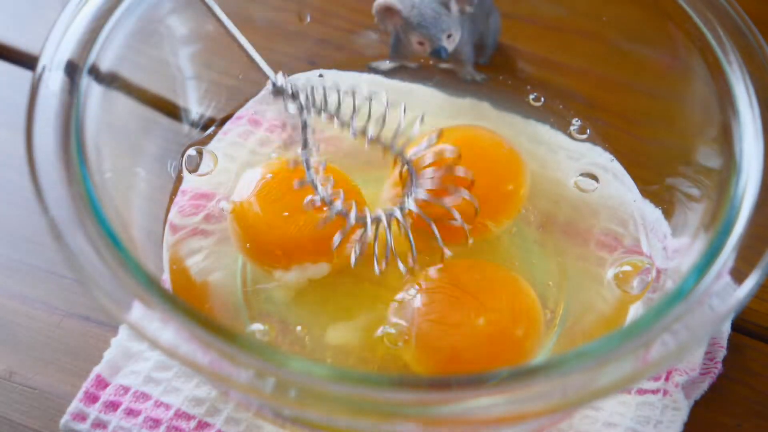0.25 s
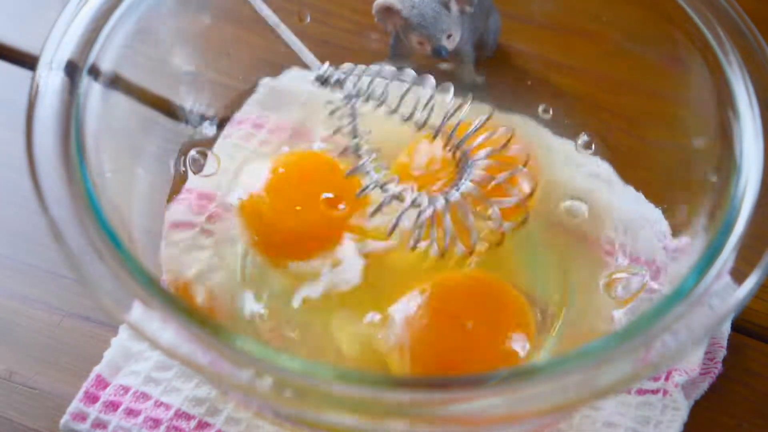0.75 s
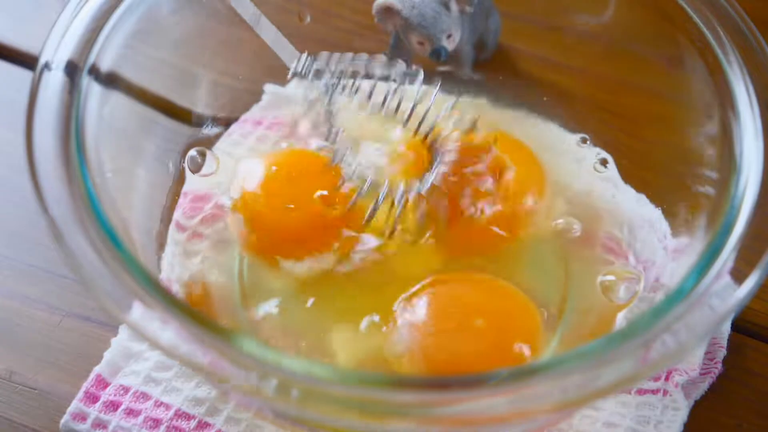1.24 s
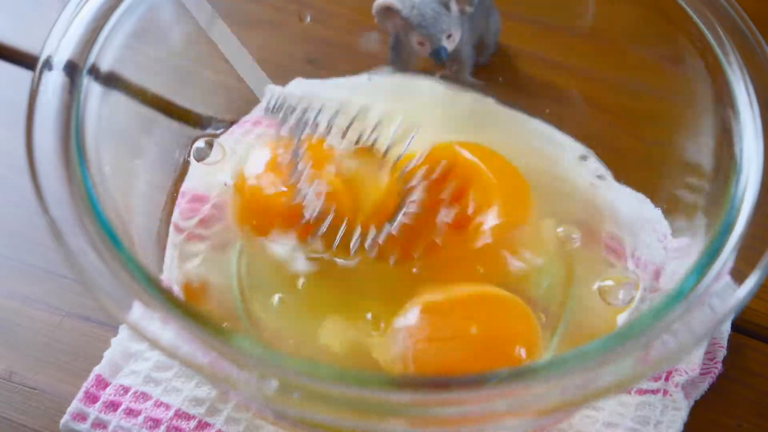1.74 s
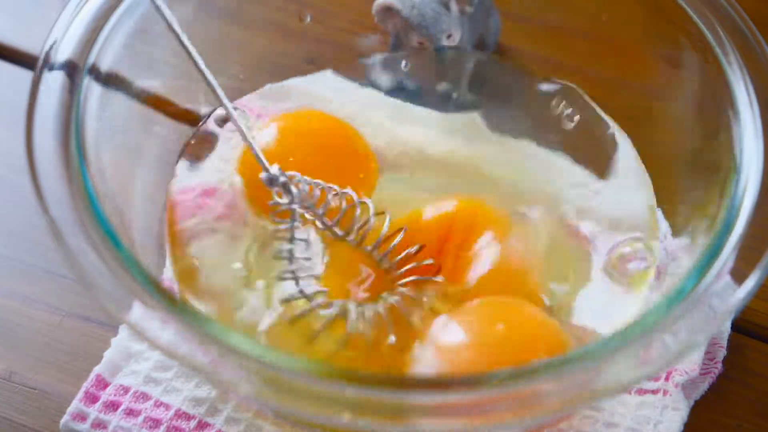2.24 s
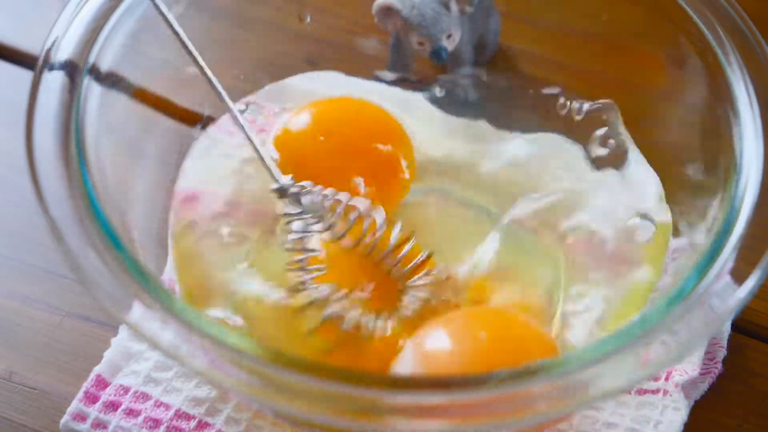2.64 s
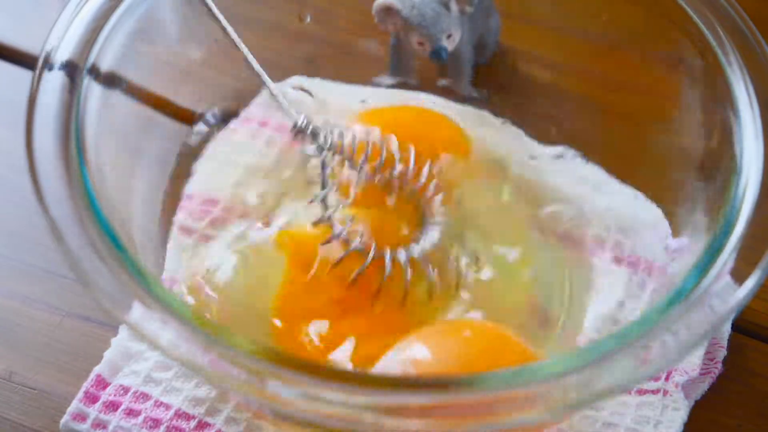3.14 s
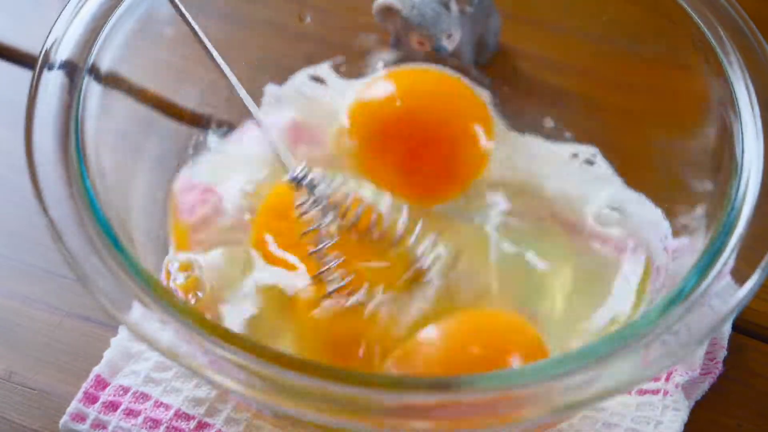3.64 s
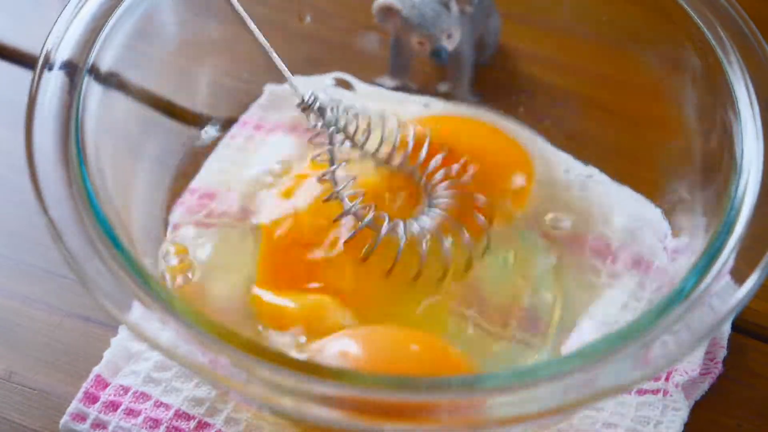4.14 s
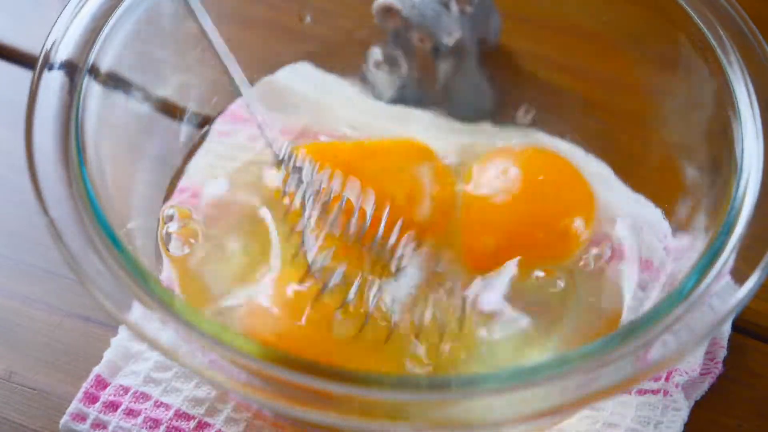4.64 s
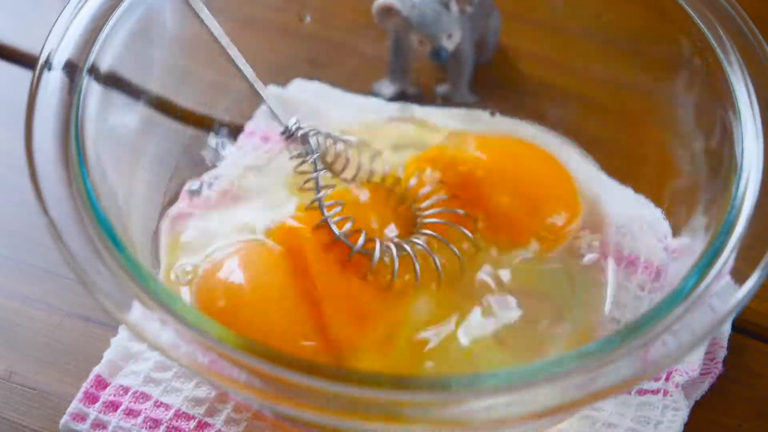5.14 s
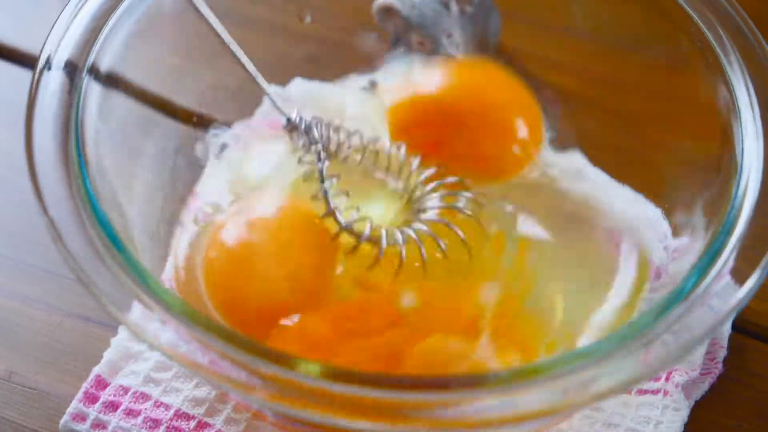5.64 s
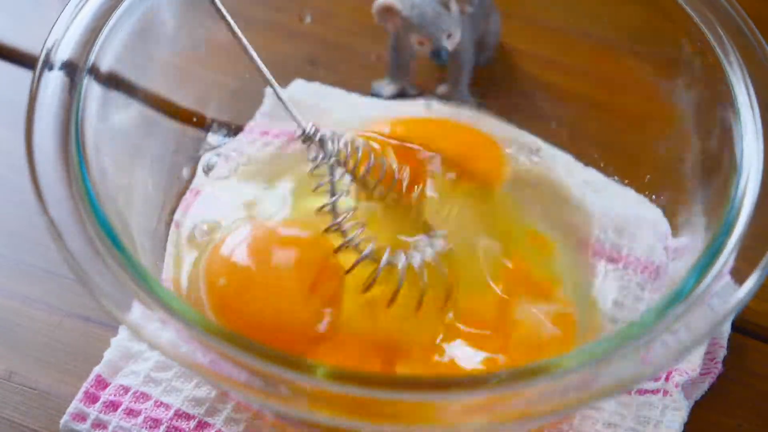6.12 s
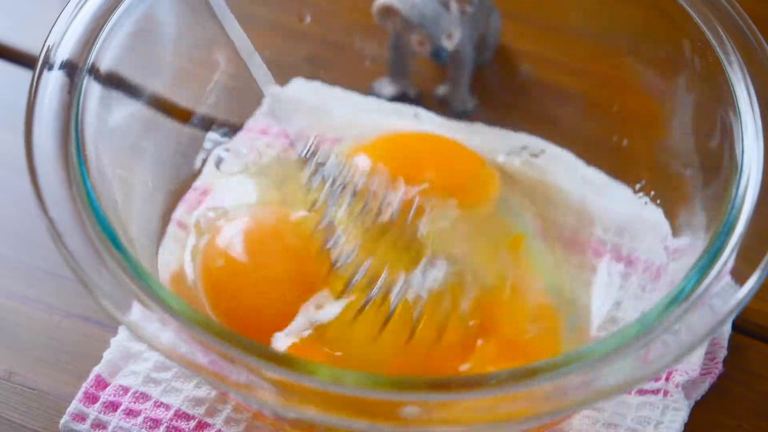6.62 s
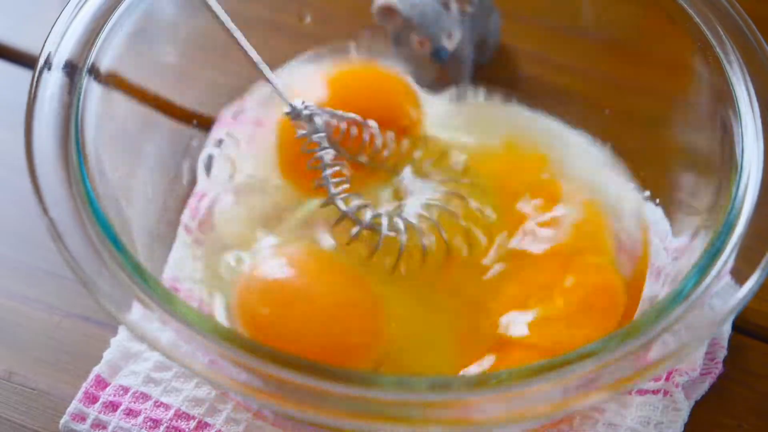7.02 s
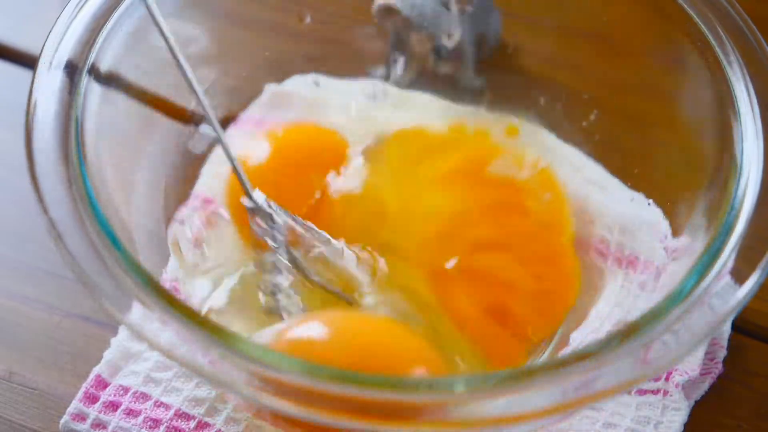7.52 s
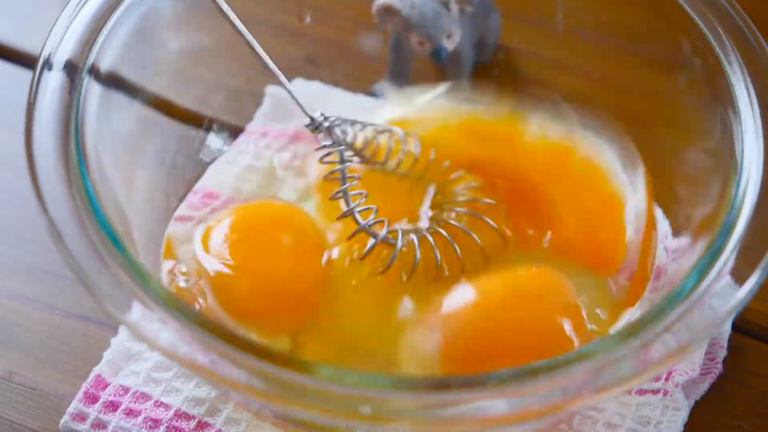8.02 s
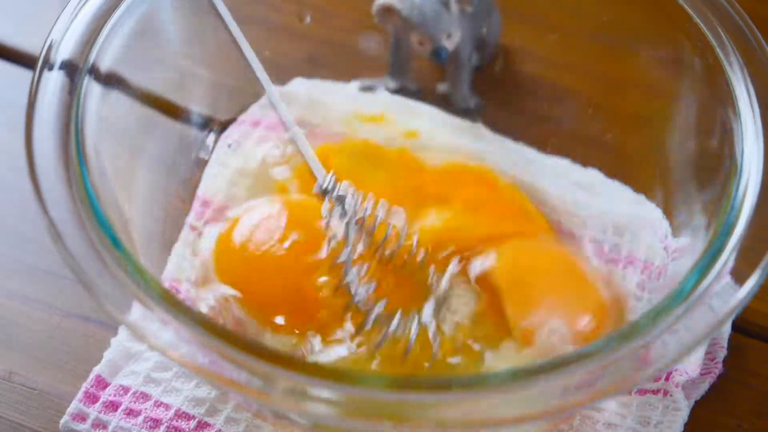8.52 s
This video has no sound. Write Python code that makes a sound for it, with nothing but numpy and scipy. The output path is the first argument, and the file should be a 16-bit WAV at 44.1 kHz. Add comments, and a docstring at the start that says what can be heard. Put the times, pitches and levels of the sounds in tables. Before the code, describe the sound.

A quiet kitchen with low rumble, soft hiss and a barely audible hum, heard close in mono. From 0.35 seconds a wire coil whisk touches a glass bowl of raw eggs: crisp, tinny taps with a brief springy ring, unevenly spaced until about 1.8. Then strokes come about five a second, singing brightly around 2 to 4, with scratchy skids between them; a stronger clack falls near 4.2. From 4.5 the coil sinks deeper, so taps become lower, rattling and less ringing. Sharp bubble pops sound at about 5.4 and 5.6, with sticky snaps around 6.2 to 6.8. From 6.7 to 8 taps thin out and soft wet swishes show through, with a pop near 7.7. At 8.04 a loud wet plop with a sharp snap bursts, the loudest moment, and the glass rings faintly. Softer taps and swishes follow, ending with a firmer clatter at 8.7.

```python
"""A coil whisk stirs raw eggs in a glass bowl on a cloth, heard close up in mono in a quiet kitchen. Each
stroke taps the glass: the wire turns, noise and sine modes, clatter and sing until the egg chokes them. The
deeper the coil, the less it sings and the more it clatters low; now and then the glass rings faintly. Grains of
tick and crackle swish as the coil skids and sweeps, air pockets pop as gliding tones, and films of egg white
snap, and some pockets burst, as short noise bursts, over room rumble, hiss and a faint hum."""
import sys
import numpy as np
from scipy import signal
from scipy.fft import rfft, irfft
from scipy.io import wavfile

SR = 44100
rng = np.random.default_rng(int(sys.argv[2]) if len(sys.argv) > 2 else 0)


def persist_wave(psi):
    """Save psi, clipped to +-1, as 16-bit WAV."""
    counts = np.round(np.clip(psi, -1, 1) * 32767).astype(np.int16)
    wavfile.write(sys.argv[1], SR, np.atleast_2d(counts).T)


N = 386757
T = np.arange(2 ** 14) / SR  # time within one event (s)
F = np.fft.rfftfreq(len(T), 1 / SR)  # frequencies within one event (Hz)

# Coil meets glass. Each row: start in seconds, strength of the blow in dB,
# main coil ring over the blow in dB, depth of the coil in the egg from 0 to 1.
COIL_TAPS = [(0.3515, -41.5, 6, 0.23), (0.6185, -39.5, 1, 0.12), (0.8605, -45, -4.5, 0.44),
             (1.3034, -43.5, 1, 0.07), (1.7551, -37, 5.5, 0.13), (1.966, -40.5, 6.5, 0.21),
             (2.168, -41.5, 13, 0.15), (2.364, -44, 19, 0.03), (2.412, -59, 9, 0.5),
             (2.5757, -40, 11.0, 0.0), (2.77, -40.5, 5, 0.44), (2.982, -39.0, 9, 0.24),
             (3.167, -41, 7, 0.54), (3.3777, -40, 7.5, 0.3), (3.587, -43.0, 9.5, 0.36),
             (3.773, -44, 8, 0.58), (3.971, -35, 5.5, 0.25), (4.013, -48, 6.5, 0.53),
             (4.179, -33.5, -5.0, 0.35), (4.2137, -57, 6, 0.3), (4.3541, -37.5, 1, 0.39),
             (4.54, -44, -9, 0.83), (4.738, -42.5, -1, 0.7), (4.925, -36, -10, 0.54),
             (5.142, -37.5, -2, 0.66), (5.2513, -46, 0, 0.5), (5.381, -40.5, -0.5, 0.52),
             (5.476, -50.5, 6.5, 0.5), (5.6269, -38, 0, 0.84), (5.7554, -58.5, 5.5, 0.74),
             (5.8793, -44.5, -5.0, 0.92), (6.0124, -41.5, 0, 0.66), (6.1108, -49, -1.5, 0.85),
             (6.1875, -49, -2, 0.89), (6.2399, -39, -4.0, 0.81), (6.4065, -36.5, 3.5, 1),
             (6.521, -40, 1.5, 0.92), (6.7106, -40.0, -7, 1), (6.9888, -54, 6.5, 0.9),
             (7.3699, -42, 0, 0.84), (7.8438, -48.5, 5.5, 0.58), (8.007, -50, -6.0, 0.99),
             (8.1487, -41, -1, 0.6), (8.2958, -54.5, -3, 0.84), (8.3722, -46, 3.5, 0.68),
             (8.428, -44.5, 4.5, 0.72), (8.5715, -56.5, -5.0, 0.79), (8.714, -38, -4, 0.82)]
# Short resonances of single turns pressed on the glass. Each row: frequency in Hz, level in dB.
TURN_RESONANCES = [(830, 1), (1020, 1.5), (1350, -17), (2200, -8.5), (2500, -2.5), (2790, -3), (3030, -1.5),
                   (3290, 2.5), (3950, -5), (4260, -0.5), (4620, 5), (5000, 2), (5480, -5.5), (5780, -1.5),
                   (6120, -3.5), (6500, 2.5), (6830, -2.5), (7120, 2), (7700, 3), (8300, -3.5),
                   (9250, -0.5), (9580, 2), (10250, -3.5), (10620, -3), (11600, -3), (12550, -3.5),
                   (13850, -8.5), (14300, -6), (14900, -10)]


def undb(db):
    """Decibels to gain."""
    return 10 ** (np.asarray(db) / 20)


def fade(t60):
    """Exponential decay by 60 dB in t60 seconds."""
    return np.exp(-np.log(1000) * T / max(t60, 1e-4))


def band(x, lo_hz, hi_hz, order=2):
    """Causal band-pass, kept below the top of the sampled range."""
    hi_hz = min(hi_hz, SR * .47)
    edges = [min(lo_hz, hi_hz - 20), hi_hz]
    return signal.sosfilt(signal.butter(order, edges, "band", fs=SR, output="sos"), x)


def unit(x):
    """Scale an event to rms 1 over its first 25 ms."""
    return x / np.sqrt(np.mean(x[:SR // 40] ** 2) + 1e-18)


def add(track, s, x):
    """Mix an event into a track at time s."""
    i = max(int(s * SR), 0)
    track[i:i + len(x)] += x[:max(N - i, 0)]


def sine(hz):
    """A mode with a chance starting phase."""
    return np.sin(2 * np.pi * (hz * T + rng.random()))


def over_time(s, curve):
    """Read a curve of (seconds, value) rows at time s."""
    return np.interp(s, *np.transpose(curve))


def kitchen(air_db=-54, hum_half_width_hz=3):
    """Steady low room rumble and hiss are shaped noise; narrow noise bands make a slightly wavering hum."""
    # Spectrum of the kitchen air. Each row: frequency in Hz, relative density in dB per Hz.
    air_shape = [(12, -37), (20, 2), (86, -2.5), (127, -5), (163, -4), (255, -11), (328, -10), (367, -14),
                 (434, -13), (698, -12.5), (1000, -12.5), (1260, -20), (1760, -24.5), (2820, -31),
                 (16000, -33.5)]
    # Faint appliance hum. Each row: frequency in Hz, rms level in dB.
    hum_lines = [(282, -71), (344, -71), (594, -76)]
    hz, db = np.transpose(air_shape)
    f = np.maximum(np.fft.rfftfreq(N, 1 / SR), 1)
    shape = undb(np.interp(np.log(f), np.log(hz), db))
    air = irfft(rfft(rng.standard_normal(N)) * shape, N)
    out = undb(air_db) * air / air.std()
    for hum_hz, hum_db in hum_lines:
        line = band(rng.standard_normal(N), hum_hz - hum_half_width_hz, hum_hz + hum_half_width_hz, order=1)
        out = out + undb(hum_db) * line / line.std()
    return out


def snaps(t60=0.006, spread=1.55, faint_count=4, faint_db=-47, faint_hz=11000):
    """A film of egg white tears, or an air pocket bursts: a burst of band noise that dies in a few ms."""
    # Films snapping, and air pockets bursting at 2.78 s and 8.04 s (the second opens the loud plop). Each row:
    # start in seconds, peak in dB, centre in Hz.
    bursts = [(.184, -44.5, 2900), (1.288, -38, 10000), (2.7825, -33, 2780), (2.8946, -36.5, 10500),
              (3.2531, -32, 12500), (5.3284, -33, 11000), (5.5915, -30.5, 11200), (5.706, -34, 10000),
              (5.799, -40, 3300), (6.235, -24.5, 9500), (6.329, -31, 9000), (6.4917, -37, 7000),
              (6.513, -27.5, 11000), (6.843, -24.5, 6860), (7.7186, -27, 10600), (8.0397, -8, 5340),
              (8.1992, -36, 4000)]
    out = np.zeros(N)
    # fainter films snap at chance moments
    faint = [(s, faint_db, faint_hz) for s in rng.random(faint_count) * N / SR]
    for s, db, hz in list(bursts) + faint:
        tear = band(rng.standard_normal(len(T)) * fade(t60), hz / spread, hz * spread)
        add(out, s, undb(db) * tear / np.abs(tear).max())
    return out


def turn_colour(width_hz=125, between_db=-15, size_spread_db=4.5, scatter_hz=75):
    """Gain over frequency of the turns; each contact favours other resonances."""
    hz, db = np.transpose(TURN_RESONANCES)
    size = undb(db + size_spread_db * rng.standard_normal(len(hz)))
    hz = hz + scatter_hz * rng.standard_normal(len(hz))
    grid = F[::10]
    peaks = 1 / (1 + ((grid[:, None] - hz) / width_hz) ** 2) ** 2
    return np.interp(F, grid, np.sqrt(peaks @ size ** 2 + undb(between_db) ** 2))


def through_turns(noise):
    """Colour the noise of one contact with the resonances of the turns."""
    return irfft(rfft(noise) * turn_colour(), len(T))


def tap_colour(s, blow_db, ring_db, depth):
    """Levels of the five registers, then tone over clatter, in dB: a deep coil clatters low and hardly sings."""
    # Sizzle against upper ring, around its usual value. Each row: time in seconds, level in dB.
    brightness = [(.35, -2.5), (1.3, -6), (1.75, 3), (3.4, -1), (4.3, 2), (5.0, 1), (5.5, -1.5), (6.0, 1),
                  (6.7, -1), (8.7, 1)]
    # a blow softer than ordinary is duller: its two low registers lose only part of the level
    ordinary_blow_db, soft_dulling = -39.5, 0.4  # dulling in dB per dB
    # levels against an ordinary blow with the coil barely wet
    knock_db, low_clatter_db, upper_ring_db, sizzle_db = -13.5, -26, 0.5, -1.5
    sunk_clatter_db = 27  # low clatter added at full depth
    # tone over clatter: barely wet, change at full depth, and dB per dB of main ring
    dry_tone_db, sunk_tone_db, tone_per_ring = 13.5, -35, 0.37
    body_db = blow_db + soft_dulling * (ordinary_blow_db - blow_db)
    bright_db = over_time(s, brightness)
    return (body_db + knock_db,
            body_db + low_clatter_db + sunk_clatter_db * depth,
            blow_db + ring_db,
            blow_db + upper_ring_db - bright_db / 2,
            blow_db + sizzle_db + bright_db / 2,
            dry_tone_db + sunk_tone_db * depth + tone_per_ring * ring_db)


def taps(attack_s=0.00049, choke_s=0.0098, upper_choke_s=0.014, free_db=-31, beat_hz=17, scatter_hz=22,
         rattle_db=-26, rattle_t60=0.3, knock_t60=0.019, tick_db=-3.5, tick_t60=0.016, upper_tone_db=2):
    """Blows excite noisy turns and sine modes; the egg chokes the coil, and a faint free ring is left."""
    # Registers of a tap, from knock to sizzle. Each row: low edge in Hz, high edge in Hz.
    registers = [(720, 2070), (2300, 4020), (4080, 5505), (5300, 9140), (8700, 15400)]
    # Coil modes that sing. Each row: frequency in Hz, level in dB, t60 in seconds when swinging free.
    coil_modes = [(2990, 0, .08), (4300, -19, .12), (4560, -13, .15), (4665, 0, .44), (4790, -15, .15),
                  (5510, -11, .12), (6860, -2, .15), (7060, 0, .18), (9630, 0, .2), (10430, -7, .12),
                  (10690, 0, .2), (12660, -4, .15), (14100, -11, .1), (14400, -8, .12)]
    # Egg clinging to the coil lowers its modes. Each row: time in seconds, drop in Hz (negative raises).
    egg_load = [(.35, -51.5), (1.75, 41.5), (2.2, -7), (3.2, 5.5), (3.6, 108), (4.4, 209), (5.0, 125)]
    # One lifted wire sings on. Each row: start in seconds, frequency in Hz, level in dB, t60 in seconds.
    wire_rings = [(.619, 4790, -36, .11), (1.304, 4140, -45.5, 0.13), (1.305, 7060, -38, 0.084),
                  (1.756, 10540, -28.5, 0.073), (3.169, 2890, -36.5, .067), (3.972, 9470, -42, .16),
                  (4.179, 9500, -46, 0.23), (4.354, 9470, -53, .18), (4.927, 9535, -35, .1),
                  (5.142, 10750, -44, .15), (5.382, 9760, -44, .17)]
    # clatter dies faster in higher registers: t60 at the reference pitch, power by which it shortens
    clatter_t60, clatter_ref_hz, clatter_damping = 0.044, 4000, 0.66
    out = np.zeros(N)
    onset = 1 - np.exp(-T / attack_s)
    free_tails = [undb(free_db) * fade(t60) for _, _, t60 in coil_modes]
    for s, blow_db, ring_db, depth in COIL_TAPS:
        knock_db, *levels_db, tone_db = tap_colour(s, blow_db, ring_db, depth)
        drop_hz = over_time(s, egg_load)
        contact = through_turns(rng.standard_normal(len(T)))
        # the bowl, damped by the cloth, answers with a very short knock
        add(out, s, undb(knock_db) * unit(band(contact * fade(knock_t60), *registers[0])))
        # first touch of steel on glass: a broad tick that goes with the sizzle
        touch = band(rng.standard_normal(len(T)) * fade(tick_t60), 5200, 10500)
        add(out, s, undb(levels_db[-1] + tick_db) * unit(touch))
        # nearly equal turns beat against each other as they swing free
        slow_beat = sine(beat_hz * (.5 + rng.random()))
        fast_beat = sine(2 * beat_hz * (.5 + rng.random()))
        beating = 1 + .5 * slow_beat + .5 * fast_beat
        for (lo, hi), db in zip(registers[1:], levels_db):
            t60 = clatter_t60 * (clatter_ref_hz / lo) ** clatter_damping
            wires = contact * onset * (fade(t60) + undb(rattle_db) * fade(rattle_t60))
            clatter = band(wires, lo, hi, order=3)
            # share of clean tone in the register's power; upper_tone_db is added per octave
            clean = 1 / (1 + undb(-2 * (tone_db + upper_tone_db * np.log2(lo / 4000))))
            # a clean ring is pressed out against the glass, the highest modes last; a wet one just dies away
            hold_s = np.interp(lo, [5300, 8700], [choke_s, upper_choke_s])
            choked = clean * np.exp(-(T / hold_s) ** 2) + (1 - clean) * fade(t60)
            tone = np.zeros(len(T))
            for (hz, mode_db, _), tail in zip(coil_modes, free_tails):
                if lo < hz < hi:
                    mode = sine(hz - drop_hz + scatter_hz * rng.standard_normal())
                    tone += undb(mode_db) * mode * (choked + tail * beating)
            mix = np.sqrt(1 - clean) * unit(clatter) + np.sqrt(clean) * unit(tone * onset)
            add(out, s, undb(db) * unit(mix))
    for s, hz, db, t60 in wire_rings:
        add(out, s, undb(db) * sine(hz) * onset * fade(t60))
    return out


def swishes(tick_db=-5.5, wet_db=-3.5, spread=2.5, tick_t60=0.016, detune_hz=80, grain_db=4.2,
            ticks_per_s=1040):
    """The turns skid over the glass in tiny ticks, each ringing one resonance, amid fine wet crackle."""
    # How hard the skid is pressed. Each row: time in seconds, skid level against the blow in dB.
    pressure = [(1.97, -30), (2.36, -13), (3.0, -4.5), (3.75, -13.5), (4.55, -11), (5.0, -19.5),
                (8.7, -18.5)]
    # Slow sweeps through the depth of the egg. Each row: middle in seconds, level in dB, centre in Hz.
    egg_sweeps = [(5.67, -51, 5300), (5.956, -49.5, 5100), (6.475, -50, 4700), (6.776, -49.5, 4360),
                  (7.116, -47, 5600), (7.442, -47.5, 5500), (7.69, -50, 6100), (7.785, -50.5, 5800),
                  (8.087, -49.5, 3900), (8.37, -54, 5700), (8.661, -52, 5500)]
    # after each tap the coil skids on briefly: lag of its middle, half width of its swell, centre
    skid_lag_s, skid_half_s, skid_hz = .032, .017, 6640
    sweep_half_s = .029
    out = np.zeros(N)
    turn_hz, turn_db = np.transpose(TURN_RESONANCES)
    ring = fade(tick_t60)[:SR // 20]
    middle_s = T.mean()
    skids = [(s + skid_lag_s, skid_half_s, blow_db + over_time(s, pressure), skid_hz)
             for s, blow_db, *_ in COIL_TAPS]
    sweeps = [(s, sweep_half_s, db, hz) for s, db, hz in egg_sweeps]
    for s, half_s, db, hz in skids + sweeps:
        ticks = np.zeros(N)
        span_s = 5 * half_s
        for when, which, detune, rarity, phase in rng.random((int(ticks_per_s * span_s), 5)):
            k = int(which * len(turn_hz))
            pitch = turn_hz[k] + detune_hz * (2 * detune - 1)
            gain = undb(turn_db[k] - 4 * np.log(max(rarity, .03)))  # a few ticks stand out
            tick = gain * ring * np.sin(2 * np.pi * (pitch * T[:len(ring)] + phase))
            add(ticks, middle_s + span_s * (when - .5), tick)
        grain_sizes = undb(grain_db * np.minimum(rng.exponential(size=len(T)), 4))
        crackle = through_turns(rng.standard_normal(len(T)) * grain_sizes)
        swell = np.exp(-((T - middle_s) / half_s) ** 2 / 2)
        for part, part_db in ((ticks[:len(T)], tick_db), (crackle, wet_db)):
            part = band(part * swell, hz / spread, hz * spread)
            same_energy = np.sqrt(np.sum(swell ** 2) / np.sum(part ** 2))  # as the swell itself
            add(out, s - middle_s, undb(db + part_db) * part * same_energy)
    return out


def bubbles(lowest_hz=800):
    """Each air pocket rings as damped tones that glide as it opens; so small a source gives no bass."""
    # Air pockets opening in the egg. Each row: start in seconds, pitch in Hz, level in dB.
    pockets = [(5.106, 6160, -44), (5.111, 7840, -32), (5.339, 4630, -40), (5.3822, 5980, -14.5),
               (5.486, 4230, -37), (5.559, 4530, -46), (5.628, 5370, -15), (5.881, 2480, -35),
               (6.111, 2290, -46), (6.242, 1500, -41.5), (6.712, 2123, -25.5), (6.7109, 2950, -22),
               (6.991, 830, -42.5), (7.122, 1370, -46.5), (7.385, 1305, -50), (7.415, 1240, -47),
               (7.725, 6500, -25.5), (7.845, 2070, -42), (8.305, 844, -49), (8.373, 840, -44),
               (8.431, 2480, -35), (8.715, 824, -40)]
    # Modes of one large pocket that bursts with a loud plop; its sharp opening burst is among the snaps. Each
    # row: frequency in Hz, level in dB, t60 in seconds, glide in octaves per second, delay in seconds.
    plop_modes = [(1624, -1.5, 0.028, -8, 0.0018), (2870, 1, .012, -12, 0.001),
                  (3460, -2, 0.012, 0, 0.00025)]
    plop_s, plop_db = 8.0398, -10.5
    # a small pocket fades by 60 dB in a fixed number of cycles; its rise goes with pitch squared
    cycles, rise_oct_per_s, rise_ref_hz = 115, 26, 6000
    out = np.zeros(N)
    small = [(s, hz, db, cycles / hz, rise_oct_per_s * (hz / rise_ref_hz) ** 2) for s, hz, db in pockets]
    large = [(plop_s + delay_s, hz, plop_db + db, t60, glide) for hz, db, t60, glide, delay_s in plop_modes]
    for s, hz, db, t60, glide in small + large:
        pitch = hz * 2 ** np.clip(glide * T, -1, 1)  # at most an octave
        add(out, s, undb(db) * np.cos(2 * np.pi * np.cumsum(pitch) / SR) * fade(t60))
    return band(out, lowest_hz, 14000, order=4)


def bowl():
    """A few blows set the glass modes ringing faintly, damped by the eggs and the cloth."""
    # Blows that set the whole bowl ringing. Each row: start in seconds, level in dB.
    bowl_blows = [(5.252, -65), (6.015, -56.5), (6.241, -52), (8.043, -43), (8.429, -50.5), (8.713, -51)]
    # Glass modes. Each row: frequency in Hz, level against the blow in dB, t60 in seconds.
    glass_modes = [(1052, -4, .55), (1615, -9, .2), (1660, -11, .15), (2785, -4, .38), (2830, -11, .2),
                   (3935, -11, .3), (5020, -8, .25)]
    out = np.zeros(N)
    for s, db in bowl_blows:
        ringing = sum(undb(mode_db) * sine(hz) * fade(t60) for hz, mode_db, t60 in glass_modes)
        add(out, s, undb(db) * ringing)
    return out


def room(x, wet_db=-27, t60=0.36):
    """A weak, short wash from the kitchen walls: decaying noise after a 6 ms gap."""
    tail = band(rng.standard_normal(len(T)) * fade(t60) * (T > .006), 520, 6600, order=1)
    wash = signal.fftconvolve(x, tail / np.sqrt(np.sum(tail ** 2)))[:N]
    return x + undb(wet_db) * wash


def scene():
    """Everything happens in the bowl, straight ahead: both channels are alike."""
    close = taps() + bowl() + bubbles() + snaps() + swishes()
    mono = room(close) + kitchen()
    return np.array([mono, mono])


def record(dry, top_hz=16000):
    """A steep low-pass cuts the top."""
    return signal.sosfilt(signal.ellip(10, .2, 70, top_hz, fs=SR, output="sos"), dry)


dry = scene()
out = record(dry)
persist_wave(out)
```